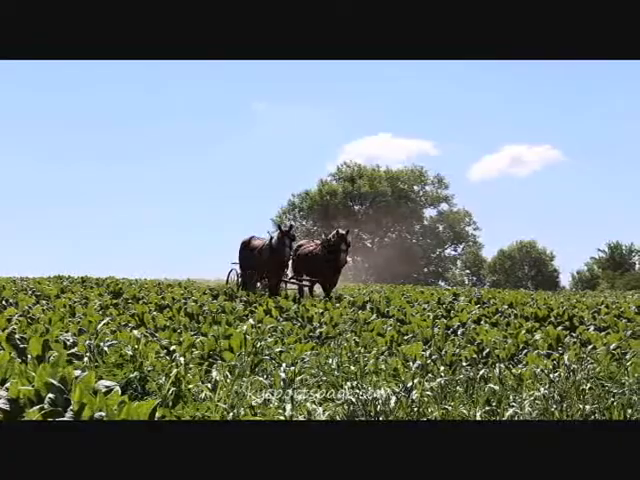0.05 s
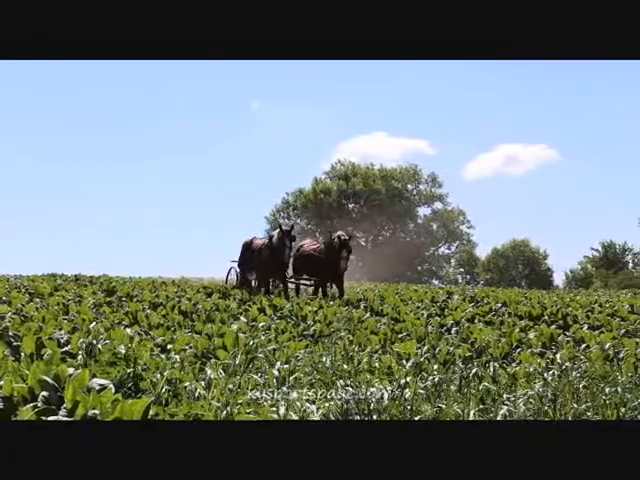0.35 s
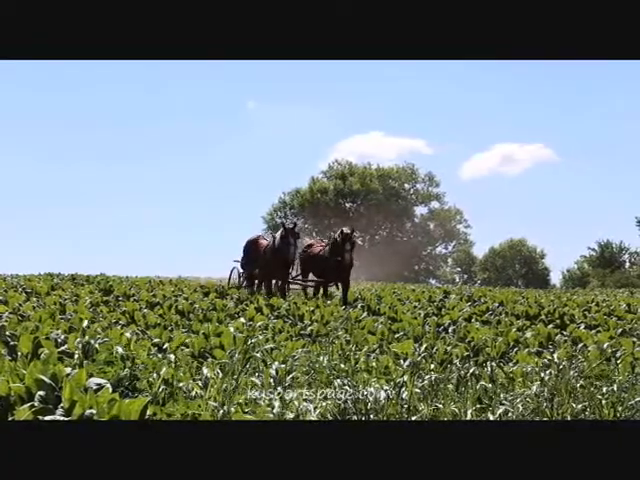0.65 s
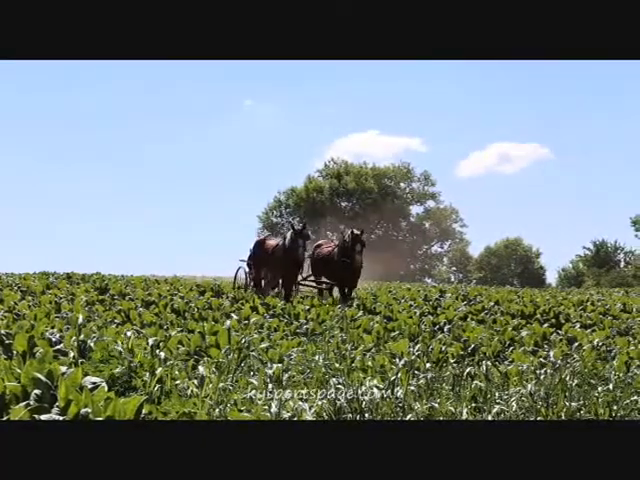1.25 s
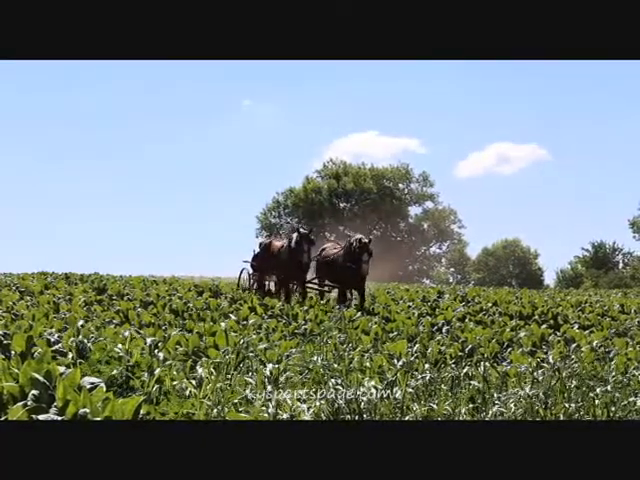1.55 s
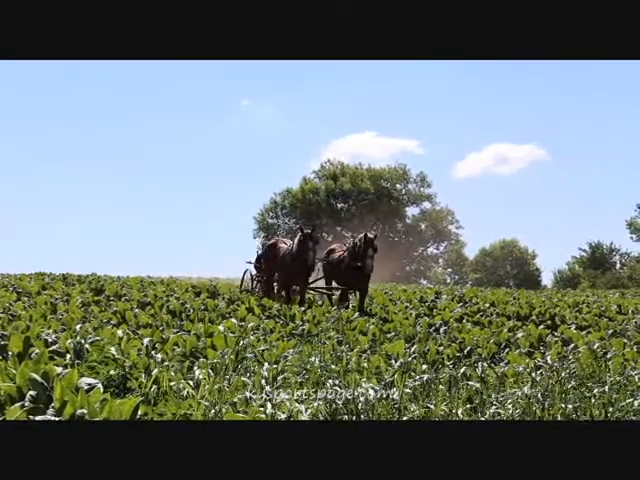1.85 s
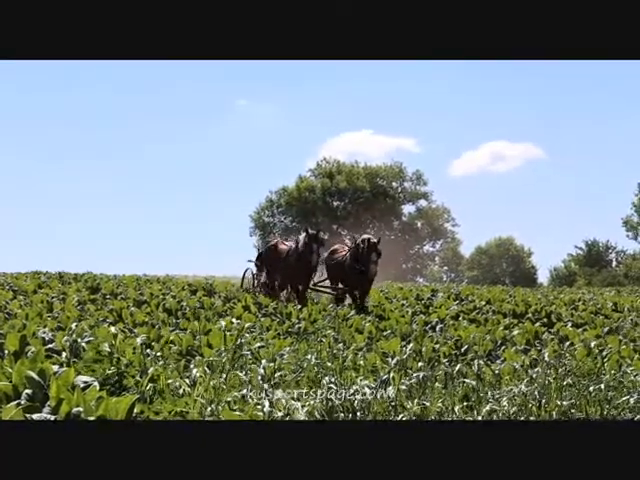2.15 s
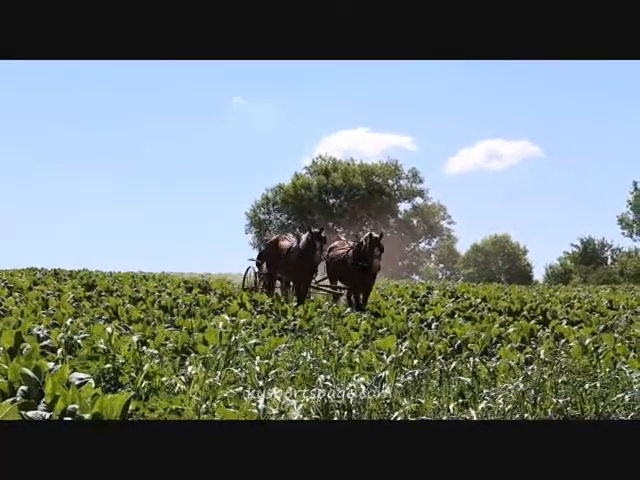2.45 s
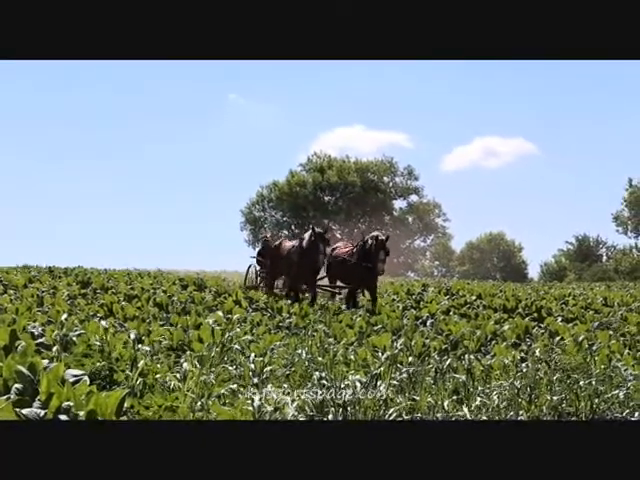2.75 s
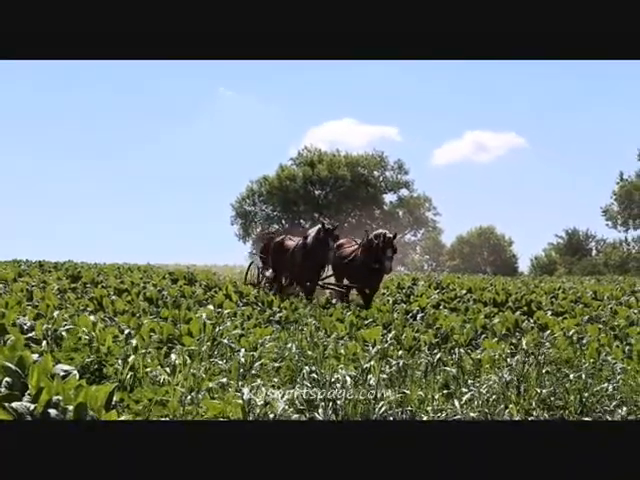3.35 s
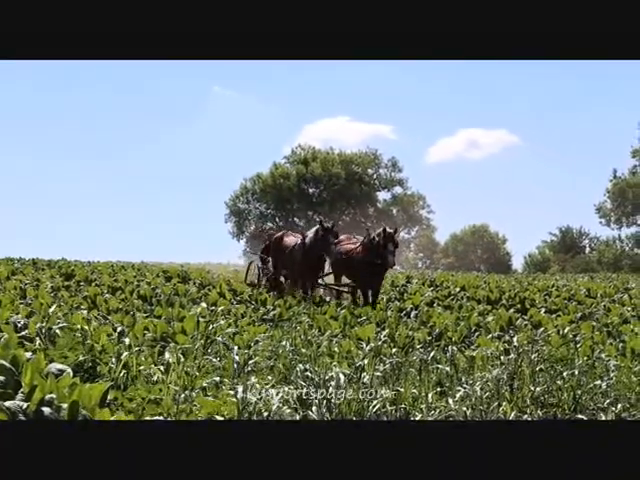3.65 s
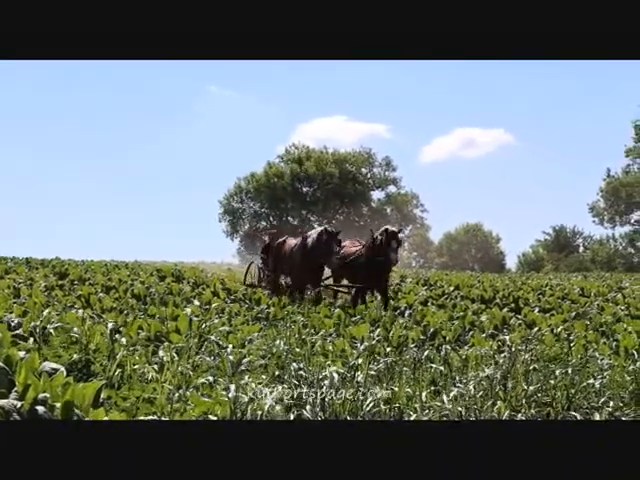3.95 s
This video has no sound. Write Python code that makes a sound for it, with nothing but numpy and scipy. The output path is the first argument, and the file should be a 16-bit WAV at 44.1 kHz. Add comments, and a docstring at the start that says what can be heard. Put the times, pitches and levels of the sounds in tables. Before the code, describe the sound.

Wind buffets the microphone throughout, rumbling hardest from about 1 to 2.5 seconds and again near 3.3, over steadily rustling leaves. Some way off, a horse-drawn cultivator scrapes through soil with light clanks, ticks and short squeaks while harness links jingle. The metal sounds cluster in the first second, thin out, then grow busier and closer from 2.6 to 4 seconds. A thin, very high whine stays underneath.

```python
"""Gusts buffet the microphone in an open field, over a steady rustle of leaves.
Some way off, two horses draw a cultivator and slowly come nearer. Its tines scrape through the soil;
its frame ticks, squeaks, knocks and clanks, and large and small harness links jingle as they strike.
The recorder adds a thin whine."""
import sys
import numpy as np
from scipy import signal
from scipy.fft import rfft, irfft
from scipy.io import wavfile
from scipy.ndimage import uniform_filter1d, map_coordinates

SR = 44100
rng = np.random.default_rng(int(sys.argv[2]) if len(sys.argv) > 2 else 0)


def inscribe(sig):
    """Save sig as 16-bit PCM at rate SR to the path in sys.argv[1].

    A 1-D sig is mono; a 2-D sig holds one channel per row.
    Samples are clipped to [-1, 1] before scaling.
    """
    pcm = np.round(np.clip(np.atleast_2d(sig).T, -1, 1) * 32767)
    wavfile.write(sys.argv[1], SR, pcm.astype(np.int16))


N = 176400


def undb(db):
    """Decibels to gain."""
    return 10 ** (np.asarray(db) / 20)


def unit(x):
    """Scale to rms 1."""
    return x / np.sqrt(np.mean(x ** 2))


def curve(rows):
    """Join (time [s], value) rows by straight lines."""
    return np.interp(np.arange(N) / SR, *np.array(rows).T)


def colour(x, spectrum):
    """Filter by (frequency [Hz], level [dB]) rows; rms 1."""
    hz, db = np.array(spectrum).T
    f = np.maximum(np.fft.rfftfreq(len(x), 1 / SR), 1)
    gain = undb(np.interp(np.log(f), np.log(hz), db))
    low_cut = np.minimum(f / hz[0], 1) ** 2
    return unit(irfft(rfft(x) * gain * low_cut, len(x)))


def noise(spectrum):
    """Noise of the given spectrum; rms 1."""
    return colour(rng.standard_normal(N), spectrum)


def wander(rate_hz):
    """Smooth random drift; rms 1."""
    position = np.arange(N) / SR * rate_hz
    return unit(map_coordinates(rng.standard_normal(N // 10), [position], order=3, mode="wrap"))


def fade(t60):
    """Half a second of exponential decay."""
    return np.exp(-np.log(1000) * np.arange(SR // 2) / SR / t60)


def add(out, at, x):
    """Mix x in at a time in seconds."""
    i = int(np.clip(at * SR, 0, N - 1))
    out[i:i + len(x)] += x[:N - i]


def ring(modes, ring_share=1, register_db=(0, 0, 0, 0)):
    """One blow on metal: the spot struck favours some modes; contact damps them and makes them chatter."""
    t = np.arange(SR // 2) / SR
    out = np.zeros(len(t))
    for hz, db, t60 in modes:
        detune, phase = rng.standard_normal(2)
        tone = np.sin(2 * np.pi * (hz * (1 + 0.00252 * detune) * t + phase))
        chatter = 1 + 0.79 * np.interp(t, np.linspace(0, .5, num=90), rng.standard_normal(90))
        register = np.searchsorted((8000, 10800, 12500), hz)  # low, middle, upper or top
        out += undb(db + register_db[register]) * fade(t60 * ring_share) * chatter * tone
    return out * (1 - np.exp(-t / 0.0012))  # 1.2 ms attack


# Leaves and open air around the microphone (frequency [Hz], level [dB])
LEAF_SPECTRUM = [(120,-29),(200,-0.5),(330,-4.5),(520,-2),(760,-5),(1100,-6),(1500,-7.5),(1900,-10.5),(2400,-7.5),(3000,-8.5),(4400,-12),(6200,-22),(10000,-21.5),(12200,-29),(13600,-21),(14800,-34),(16000,-49)]

def leaves():
    """Leaves rustle evenly all round, with a slight flicker."""
    return noise(LEAF_SPECTRUM) * undb(-45.5 + 0.74 * wander(14))


# Light air at the microphone (frequency [Hz], level [dB])
BREEZE_SPECTRUM = [(18,-25),(45,11),(75,13),(120,-17),(250,-27),(600,-54)]

def breeze():
    """A steady breeze rumbles on between the gusts."""
    return undb(-48.5) * noise(BREEZE_SPECTRUM)


def turbulence(spectrum):
    """Low churning air, evened out so that the gust can set its level."""
    churn = noise(spectrum)
    local_power = uniform_filter1d(churn ** 2, SR // 30)
    return unit(churn / np.sqrt(local_power + 0.052))


# Gust strength right on the microphone (time [s], level [dB])
GUST_LEVEL = [(0.0, -51), (0.1, -39.5), (0.17, -49.5), (0.2, -37), (0.32, -45), (0.37, -35), (0.4, -49),
              (0.5, -39), (0.6, -48.5), (0.86, -39), (0.9, -45), (0.97, -28.5), (1.0, -40.5), (1.08, -25.5),
              (1.12, -27.5), (1.31, -36.5), (1.39, -45), (1.43, -27.5), (1.47, -36), (1.5, -32.5),
              (1.58, -24), (1.6, -33.5), (1.64, -21), (1.66, -25.5), (1.73, -21.5), (1.76, -30),
              (1.79, -22.5), (1.83, -29), (1.91, -31), (1.95, -40), (2.015, -45), (2.045, -23.5),
              (2.21, -39), (2.23, -32.5), (2.31, -27), (2.41, -30), (2.45, -28), (2.49, -42), (2.53, -43),
              (2.64, -51), (2.72, -33.5), (2.74, -30.5), (2.8, -36.5), (2.93, -36), (2.96, -54),
              (2.99, -38), (3.09, -30), (3.11, -34.5), (3.14, -26), (3.16, -43.5), (3.29, -33),
              (3.33, -24.5), (3.36, -37), (3.45, -40), (3.5, -26), (3.56, -48.5), (3.63, -33.5),
              (3.73, -33), (3.82, -48.5), (3.91, -39.5), (4.0, -41)]
# Slow rumble and small eddies of the gusts (frequency [Hz], level [dB])
RUMBLE_SPECTRUM = [(15,-35),(30,-12),(50,-4.5),(80,-0.5),(120,-1),(170,-10),(260,-20.5),(450,-36),(1000,-45),(8000,-110)]
EDDY_SPECTRUM = [(40,-27),(100,-1),(160,3.5),(210,-3),(330,-15.5),(500,-26.5),(900,-54),(2500,-58),(10000,-100)]
# Single hard buffets on the microphone (time [s], level [dB], half width [s])
WIND_BUFFETS = [(.971,-29,0.0015),(1.126,-21.5,0.0011),(1.417,-22.5,0.0019),(1.578,-23,0.0013),(1.619,-25,0.00095),(1.633,-14.5,0.0014),(1.734,-17,0.0016),(1.794,-21.5,0.0014),(1.89,-27.5,0.00089),(2.313,-20.5,0.0011),(3.329,-17,0.0014),(3.502,-25,0.0018)]

def gusts(strong_db=-28):
    """Gusts rumble on the microphone; strong ones shed brighter eddies and single pressure jolts."""
    gust_db = curve(GUST_LEVEL)
    rumble_db = gust_db - 2.5 + 3.5 * wander(35)
    eddy_db = strong_db - 8 + 2 * (gust_db - strong_db)  # eddies grow 2 dB per dB of gust
    out = undb(rumble_db) * turbulence(RUMBLE_SPECTRUM) + undb(eddy_db) * turbulence(EDDY_SPECTRUM)
    for at, db, half_width in WIND_BUFFETS:
        u = np.arange(-SR // 100, SR // 100) / SR / half_width
        jolt = 2 * u * np.exp(-u ** 2)
        add(out, at - 0.01, undb(db) * jolt)
    return out


# Tines in the soil, heard from across the field (time [s], level [dB])
SOIL_LEVEL = [(0,-52.5),(.6,-50),(1.2,-49),(1.5,-51.5),(2.4,-49.5),(2.9,-49.5),(3.1,-44.5),(3.25,-48),(3.55,-46.5),(3.85,-46.5),(4,-46)]
# Their gritty hiss (frequency [Hz], level [dB])
SOIL_SPECTRUM = [(300,-30),(800,-1),(1700,5.5),(3000,6.5),(5000,-0.5),(7000,-4.5),(10000,-6),(15000,-17)]

def soil_scrape(grains_per_s=350):
    """Dense grains of soil hit the tines, growing louder as the team nears."""
    hits = rng.random(N) < grains_per_s / SR
    grains = hits * undb(0.5 * np.minimum(rng.exponential(size=N), 4))
    power = np.abs(signal.fftconvolve(grains ** 2, fade(t60=0.039) ** 2)[:N])
    grit = np.sqrt(power) * rng.standard_normal(N)
    return colour(grit, SOIL_SPECTRUM) * undb(curve(SOIL_LEVEL))


# Chain and fittings on the cultivator (time [s], level [dB], t60 [s], resonance [Hz])
FITTING_TICKS = [(.699,-45,.09,9400),(0.725,-41.5,0.15,4700),(.905,-45,.17,9600),(1.071,-46,0.055,8300),(1.241,-47.5,.15,8100),(2.024,-43.5,.02,10000),(2.503,-44.5,0.076,8900),(2.957,-39.5,.03,9800),(3.062,-43,0.065,9600),(3.085,-39,0.07,8400),(3.121,-40.5,.1,8500),(3.486,-45,.027,6000),(3.71,-44,.09,6500),(3.761,-29,0.015,8340),(3.806,-45,.09,8400),(3.861,-37.5,.04,9600),(3.919,-43,.07,7100)]
# The noise burst of a tick (frequency [Hz], level [dB])
TICK_SPECTRUM = [(1000,-30),(2500,-3),(4000,-4),(6000,-4.5),(8300,0),(10000,-1.5),(12000,-19),(16000,-28)]

def fitting_ticks(bandwidth_hz=400):
    """Dry, bright contacts rattle as they die, each with the resonance of its own fitting."""
    out = np.zeros(N)
    for at, db, t60, hz in FITTING_TICKS:
        burst = colour(rng.standard_normal(SR // 2), TICK_SPECTRUM)
        resonance = signal.lfilter(*signal.iirpeak(hz, hz / bandwidth_hz, fs=SR), burst)
        add(out, at, undb(db) * fade(t60) * unit(burst + undb(2.5) * resonance))
    rattle = undb(2.5 * wander(250))
    return out * rattle


# The cultivator's joints (time [s], length [s], start pitch [Hz], end pitch [Hz], level [dB])
JOINT_SQUEAKS = [(0.076,0.049,2980,3120,-47),(0.262,0.032,6650,6850,-52),(0.298,0.019,3400,3210,-44),(0.396,0.074,3260,3580,-44.5),(.96,.06,6240,7000,-62),(1.095,.045,4000,4350,-49),(1.468,.03,5900,5700,-55),(2.415,.036,5430,5500,-48),(2.619,0.04,3060,3063,-33),(2.65,.047,3080,3010,-43.5),(2.643,.029,6800,6900,-51),(3.023,0.023,6870,6950,-43.5),(3.256,0.024,3080,3020,-43),(3.286,0.024,5180,5000,-44),(3.511,0.037,1685,1670,-38.5),(3.64,0.03,1670,1645,-43.5),(3.779,.038,2070,2250,-39),(3.815,.02,3090,2980,-43),(3.831,0.049,2190,2200,-42.5),(3.866,0.047,8100,7500,-40.5)]

def joint_squeaks():
    """Dry joints slip in short, raspy glides."""
    out, waver = np.zeros(N), 1 + 0.01 * wander(700)
    for at, length, start_hz, end_hz, db in JOINT_SQUEAKS:
        u = np.linspace(0, 1, int(length * SR))
        glide_hz = start_hz + (end_hz - start_hz) * u
        phase = 2 * np.pi * np.cumsum(glide_hz * waver[int(at * SR):][:len(u)]) / SR
        tone = np.sin(phase) + undb(-15) * np.sin(2 * phase)
        swell = 2 * np.sqrt(u * (1 - u))
        add(out, at, undb(db) * swell * tone)
    rasp = unit(undb(2 * wander(300)))
    return out * rasp


# Loose bars and tines (time [s], pitch [Hz], level [dB], t60 [s])
BAR_KNOCKS = [(.7,3560,-38.5,.12),(0.73,1677,-44,.2),(0.764,1108,-45,0.62),(2.24,1020,-44.5,0.18),(2.93,3650,-41,.06),(3.324,1350,-32.5,0.034),(3.98,1690,-39,0.079)]

def bar_knocks():
    """Loose bars and tines knock, each sounding one note."""
    out = np.zeros(N)
    for at, hz, db, t60 in BAR_KNOCKS:
        add(out, at, ring([(hz, db, t60)]))
    return out


# Modes of the cultivator frame (frequency [Hz], level [dB], t60 [s])
FRAME_MODES = [(1108,-5,.7),(1300,-10,.25),(1640,-5,.25),(1695,-1,.35),(2210,-5,.35),(2600,-8,.15),(3040,-4,.2),(3645,-6,.13),(4495,-10,.2),(5560,-12,.12)]
# Jolts of the frame, some way off (time [s], relative crunch level [dB], relative ring level [dB])
FRAME_JOLTS = [(.05,-48.5,-51),(0.099,-56,-44),(0.366,-48,-47),(0.531,-46.5,-49.5),(0.699,-43.5,-47),(0.726,-38,-45),(0.819,-46,-50),(0.833,-46.5,-61),(1.079,-47,-48),(2.024,-44,-61),(2.25,-45.5,-58),(2.956,-47.5,-57),(3.089,-44,-45),(3.261,-56,-51),(3.516,-48,-53),(3.645,-55,-46),(3.702,-45,-52),(3.844,-43,-52),(3.945,-43.5,-67)]
# The crunch of a jolt (frequency [Hz], level [dB])
CRUNCH_SPECTRUM = [(400,-36),(900,2),(1600,-6),(3400,4.5),(5000,-1.5),(8000,-17),(16000,-42)]

def frame_clanks():
    """Jolts ring the frame, each with a short crunch."""
    ringing, envelope = np.zeros(N), np.zeros(N)
    for at, crunch_db, ring_db in FRAME_JOLTS:
        add(ringing, at, undb(ring_db - 3) * ring(FRAME_MODES))
        add(envelope, at, undb(crunch_db + 4.5) * fade(t60=0.069))
    crunch = uniform_filter1d(envelope, size=180) * noise(CRUNCH_SPECTRUM)
    return ringing + crunch


def link_strikes(modes, strikes, bounce_s=0.008):
    """Links strike and bounce once; each strike has its own balance of modes."""
    out = np.zeros(N)
    for at, db, low_db, upper_db, top_db, ring_share in strikes:
        balance = (low_db, 0, upper_db, top_db)
        add(out, at, undb(db) * ring(modes, ring_share, balance))
        bounce_at = at + bounce_s * (.5 + rng.random())
        add(out, bounce_at, undb(db - 3) * ring(modes, ring_share, balance))
    return out


# Modes of the large and the small harness links (frequency [Hz], level [dB], t60 [s])
LARGE_LINK_MODES = [(3070,-9,.4),(5130,-7,.38),(10085,-6,.15),(10150,-3,.29),(11025,-7,.2),(11100,-11,.12),(13385,-15,.18),(13800,-20,.16)]
SMALL_LINK_MODES = [(2980,-12,.25),(5340,-4.5,.36),(6922,-14,.25),(10457,-2,.33),(10540,-10,.15),(11369,-5,.35),(13970,-15,.3),(14430,-22,.25)]
# Links striking on the horses, some way off (time [s], relative level [dB], low-mode gain [dB],
# upper-mode gain [dB], top-mode gain [dB], ring length [share of the free ring])
LARGE_LINK_STRIKES = [(0.05, -51, 4, -4, 3, 0.7), (0.348, -47.5, -8, -9, -2, 0.6),
                      (0.623, -48, 5, 6, 8, 0.25), (0.676, -51, 3, -3, 15, 0.5),
                      (0.696, -48, 0, -4, -8, 0.9), (0.727, -54.5, 10.5, 4, 6, 1.2),
                      (0.885, -43, 0, 4, 8, 0.88), (0.904, -38, -1, 2, 1, 0.61),
                      (1.08, -49, -7, 1, 4, 0.33), (2.535, -53, -1, 5, 8, 0.6),
                      (2.741, -47.5, -2, 4, -4, 0.55), (2.763, -41, 2, 1, -5, 0.61),
                      (2.864, -45, -14, -2, -3, 0.44), (2.991, -42, -9, -8, -3, 0.42),
                      (3.355, -42.5, -3, -2, -2, 0.39), (3.457, -45, 1, -4, -2, 0.28),
                      (3.491, -45, -4, -3, 0, 0.4), (3.543, -50, 7, 10, 1, 0.35),
                      (3.618, -47.5, 5.5, 7, 10, 0.4), (3.801, -41, -4, 2, -1, 0.35),
                      (3.861, -31.5, -14, -12, 0, 0.38), (3.972, -51, 5, 15, 9, 0.9)]
SMALL_LINK_STRIKES = [(1.244, -62, 13, 2, 1, 0.6), (1.752, -47, -8, -9, -11, 0.8),
                      (2.105, -52, 1, 7.5, 9, 0.92), (2.441, -63, 1, 7, 1, 1.1),
                      (2.503, -51, 5, -7, -1, 0.7), (3.061, -33, 0, -10, -11, 0.32),
                      (3.085, -58.5, 18.5, 11, 14, 0.9), (3.333, -44.5, -1.5, -13, -14, 0.96),
                      (3.402, -50.5, -8, 1, -2, 1), (3.506, -46, -4, -8, -2, 0.3),
                      (3.695, -45, -6, -17, -10, 1), (3.772, -47, -12, -5, -8, 1),
                      (3.806, -44, 5, -7, -3, 0.6), (3.99, -48, 9, 4, 9, 0.8)]

def harness(touches=130):
    """Harness links jingle: clear strikes among faint random touches."""
    large = undb(1) * link_strikes(LARGE_LINK_MODES, LARGE_LINK_STRIKES)
    small = undb(0.5) * link_strikes(SMALL_LINK_MODES, SMALL_LINK_STRIKES)
    faint = np.zeros(N)
    for k, (when, strength) in enumerate(rng.random((touches, 2))):
        modes = LARGE_LINK_MODES if k % 2 else SMALL_LINK_MODES
        add(faint, when * N / SR, 2 * strength * undb(-64) * ring(modes))
    return large + small + faint


def scene():
    """One microphone in the windy field, with the team some way off."""
    air = leaves() + breeze() + gusts()
    cultivator = soil_scrape() + fitting_ticks() + joint_squeaks() + bar_knocks() + frame_clanks()
    return (air + cultivator + harness())[None]


def record(dry, whine_hz=15657.3, top_hz=15900):
    """The recorder adds a thin whine, wavering slightly in level, and cuts the top."""
    tone = np.sqrt(2) * np.sin(2 * np.pi * whine_hz * np.arange(N) / SR)
    whine = undb(-53.5 - 0.5 * wander(24.2)) * tone
    low_pass = signal.ellip(12, .1, 80, top_hz, fs=SR, output="sos")
    return signal.sosfilt(low_pass, dry + whine)


dry = scene()
out = record(dry)
inscribe(out)
```